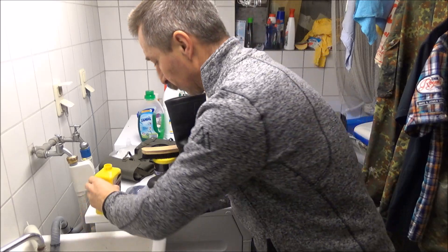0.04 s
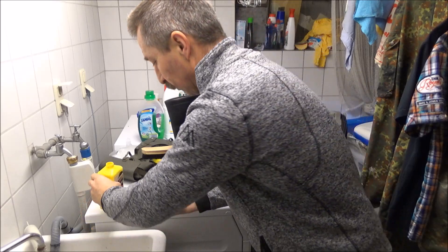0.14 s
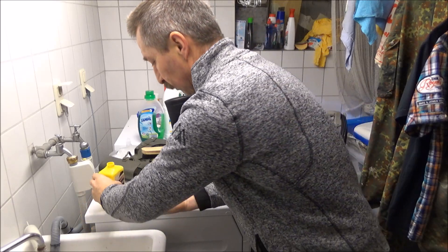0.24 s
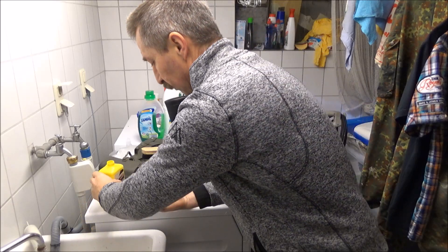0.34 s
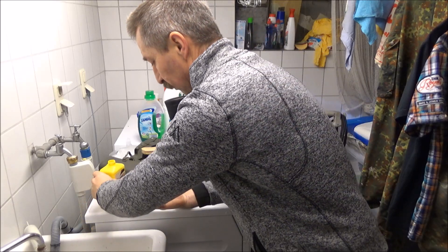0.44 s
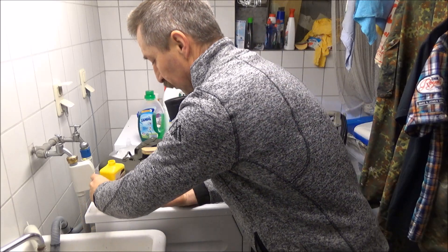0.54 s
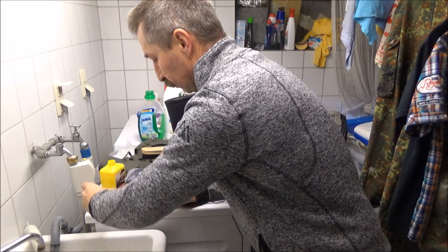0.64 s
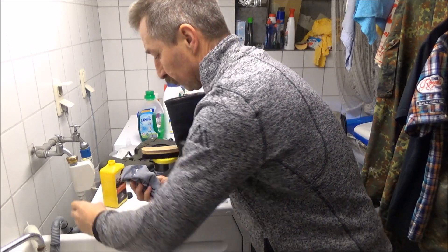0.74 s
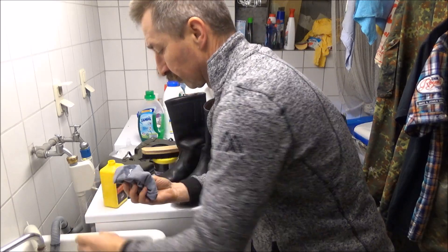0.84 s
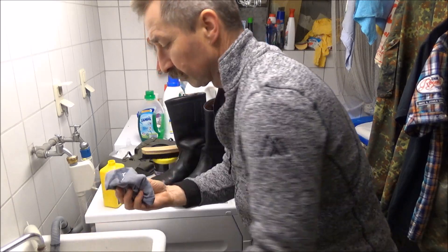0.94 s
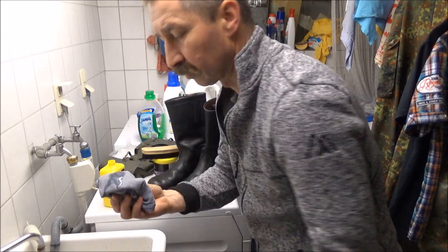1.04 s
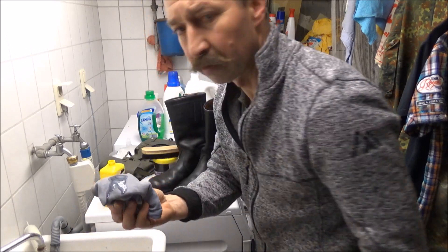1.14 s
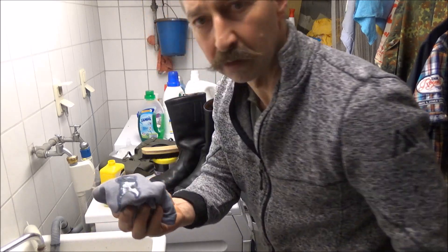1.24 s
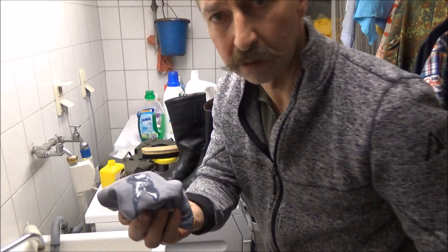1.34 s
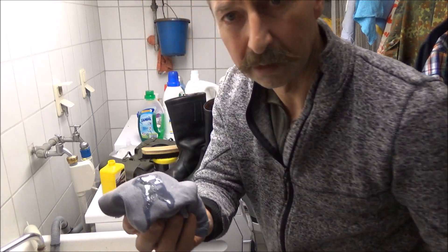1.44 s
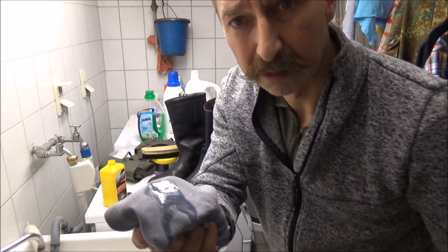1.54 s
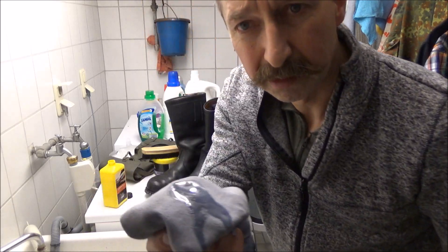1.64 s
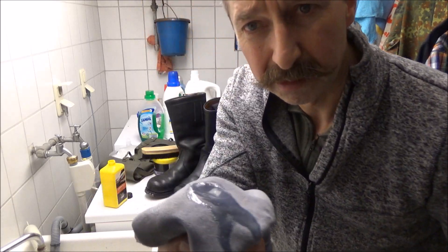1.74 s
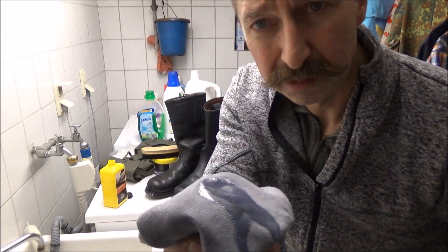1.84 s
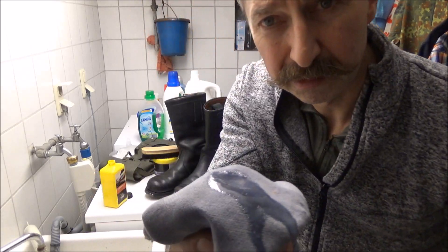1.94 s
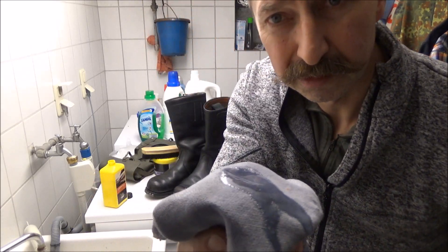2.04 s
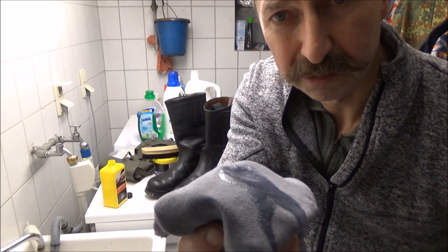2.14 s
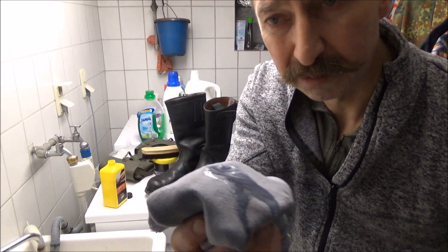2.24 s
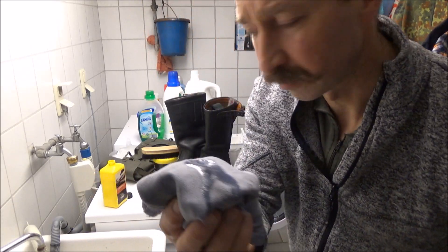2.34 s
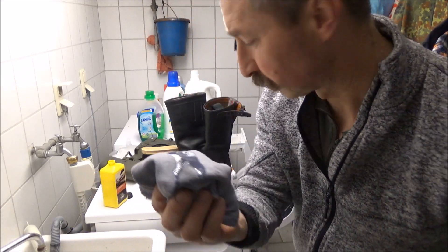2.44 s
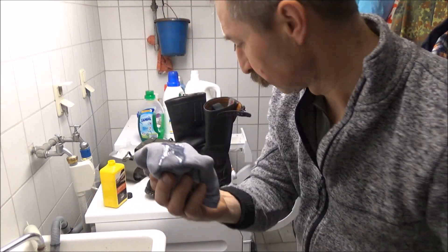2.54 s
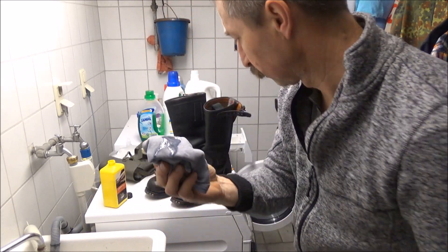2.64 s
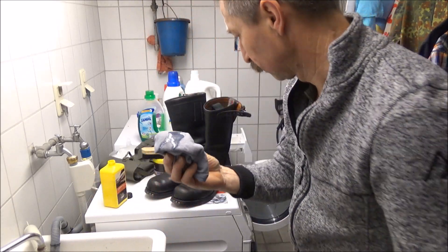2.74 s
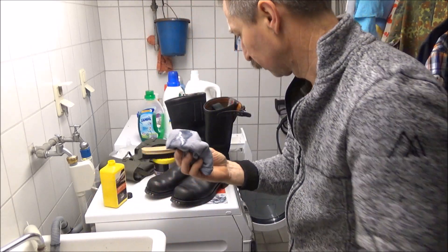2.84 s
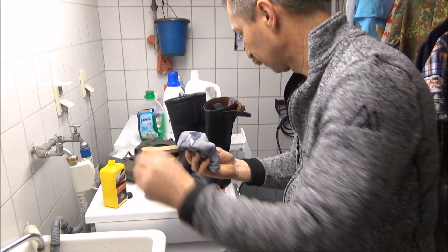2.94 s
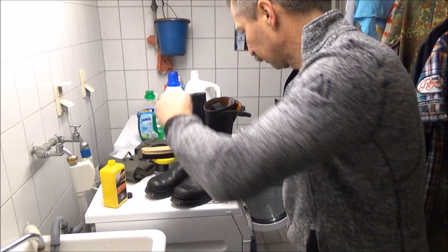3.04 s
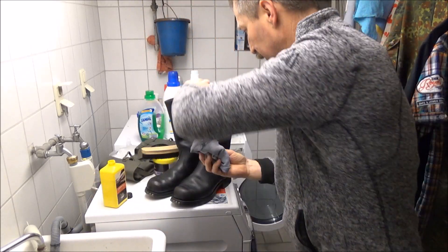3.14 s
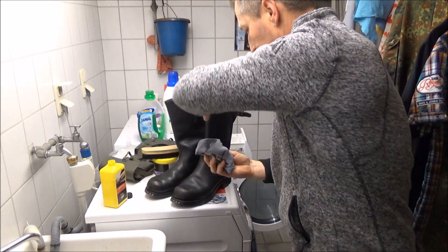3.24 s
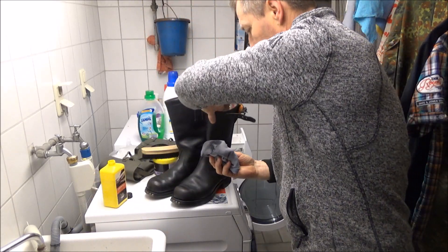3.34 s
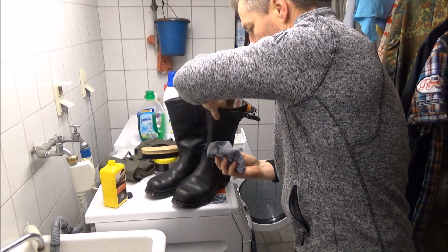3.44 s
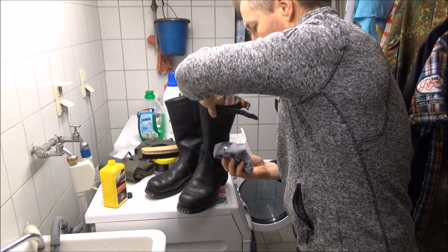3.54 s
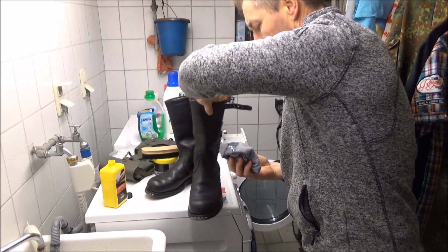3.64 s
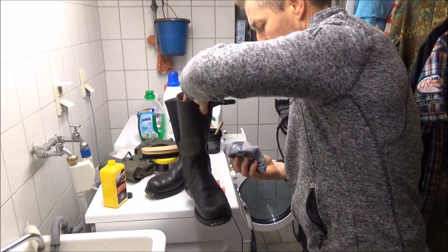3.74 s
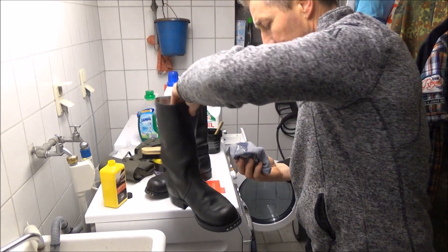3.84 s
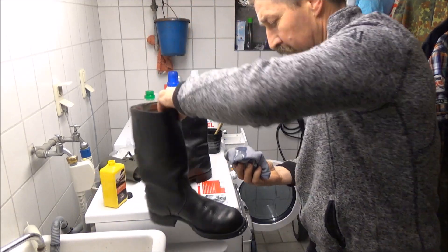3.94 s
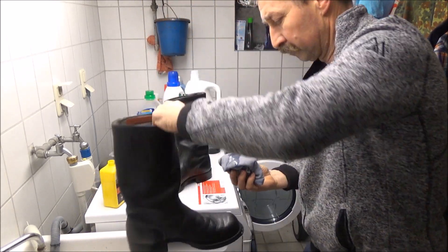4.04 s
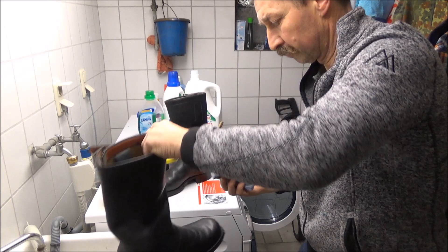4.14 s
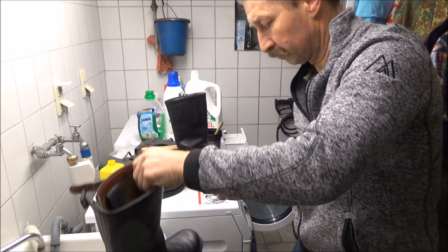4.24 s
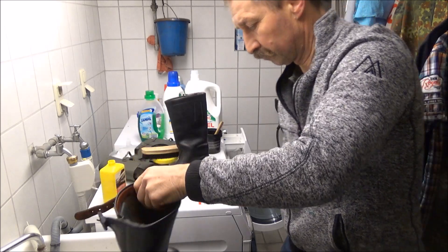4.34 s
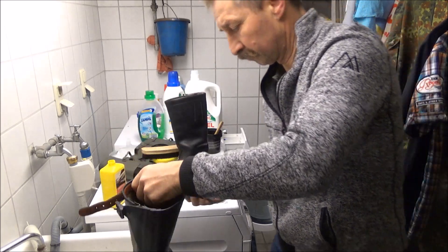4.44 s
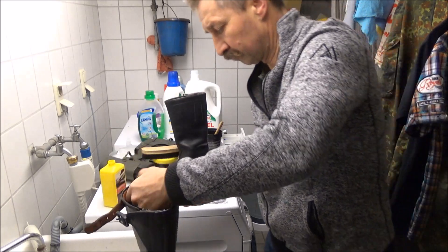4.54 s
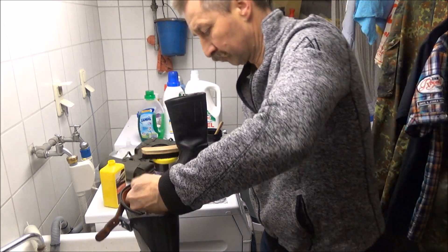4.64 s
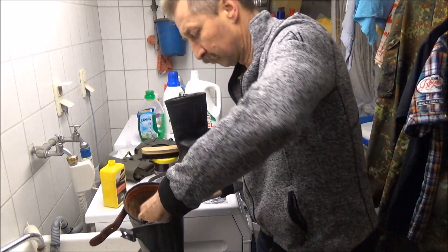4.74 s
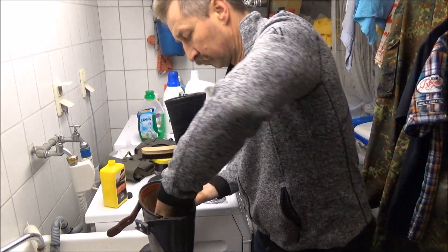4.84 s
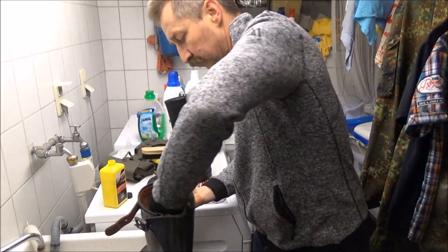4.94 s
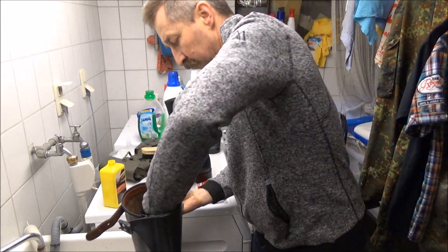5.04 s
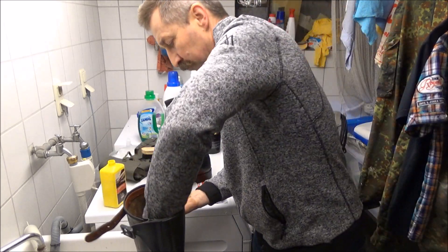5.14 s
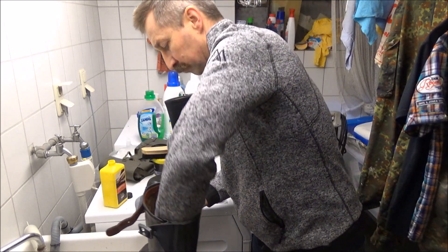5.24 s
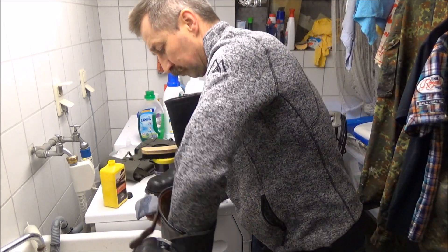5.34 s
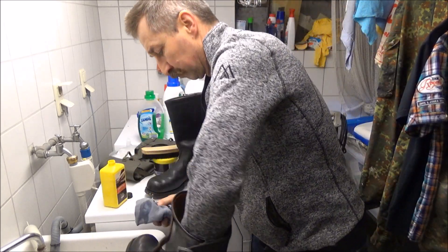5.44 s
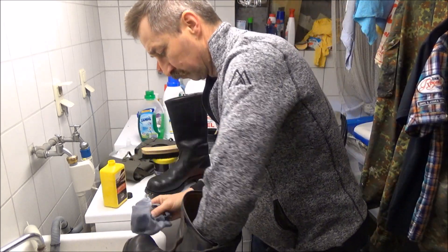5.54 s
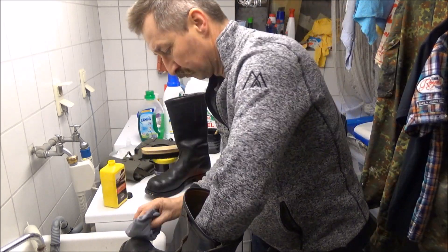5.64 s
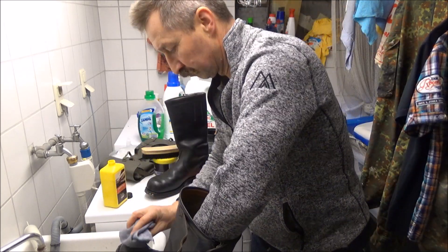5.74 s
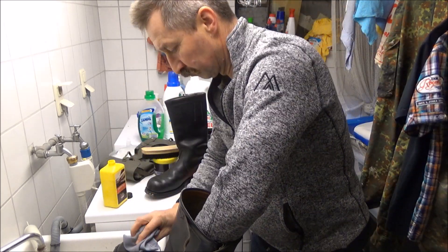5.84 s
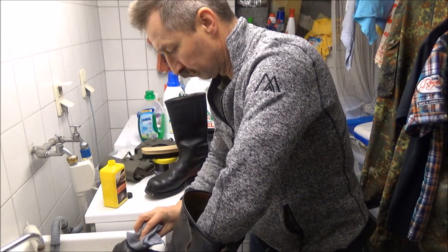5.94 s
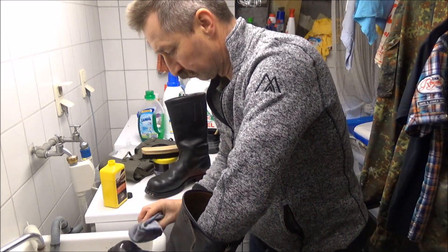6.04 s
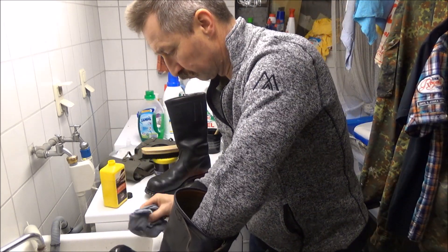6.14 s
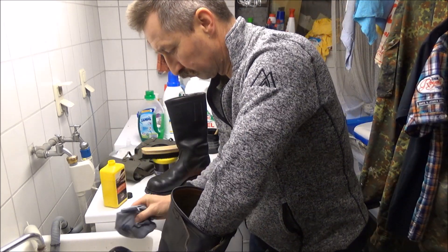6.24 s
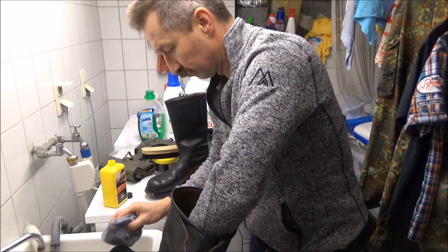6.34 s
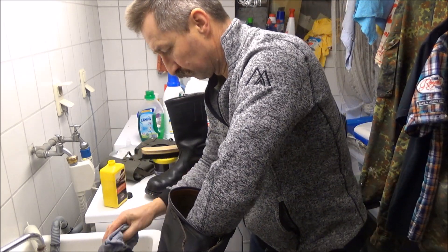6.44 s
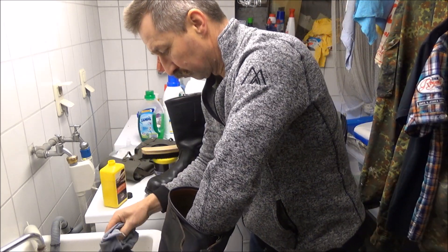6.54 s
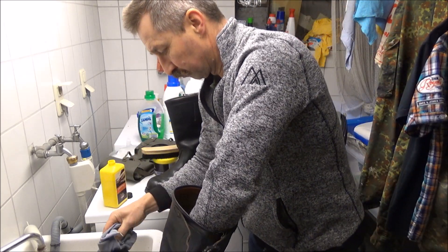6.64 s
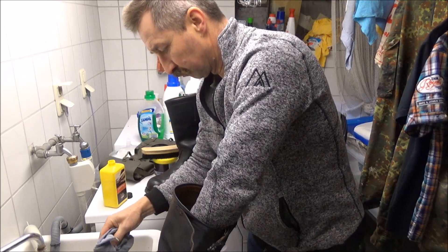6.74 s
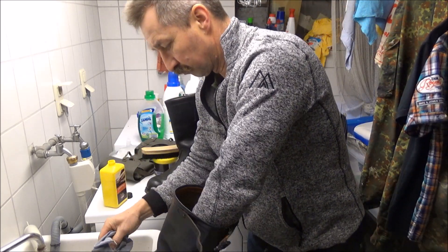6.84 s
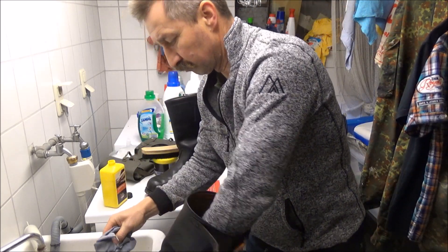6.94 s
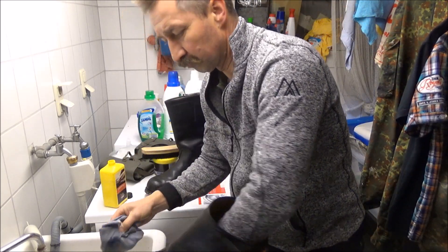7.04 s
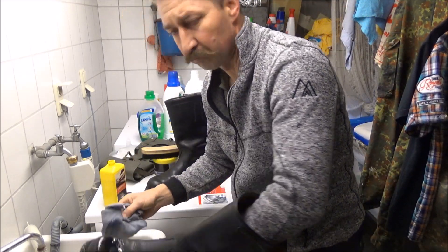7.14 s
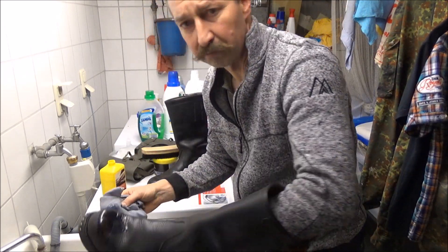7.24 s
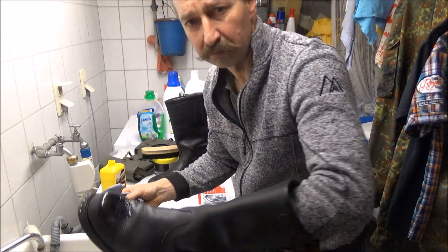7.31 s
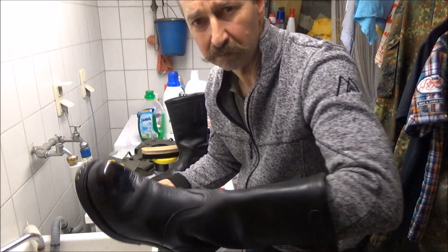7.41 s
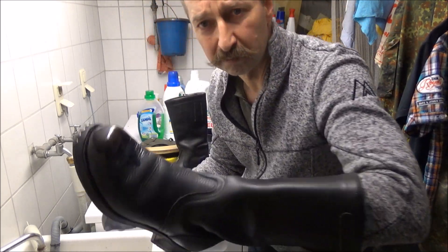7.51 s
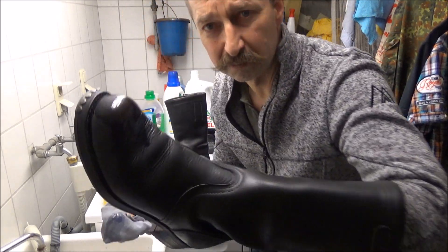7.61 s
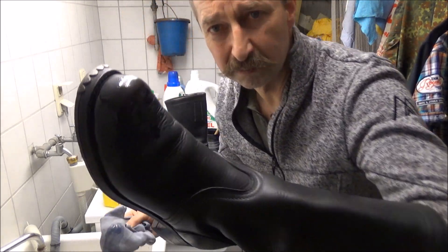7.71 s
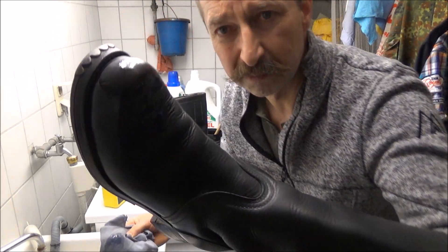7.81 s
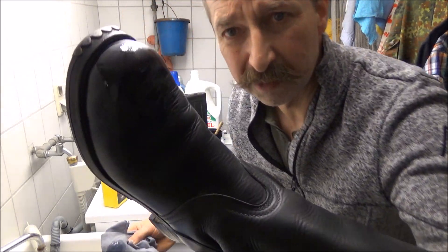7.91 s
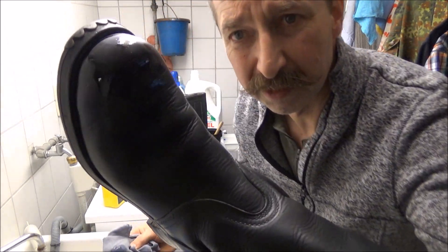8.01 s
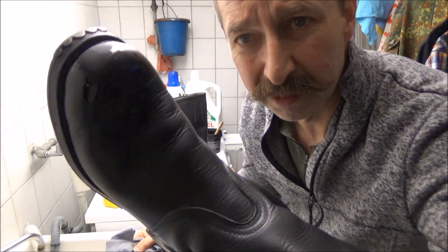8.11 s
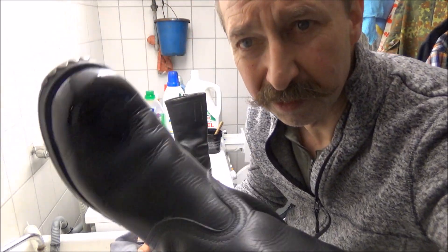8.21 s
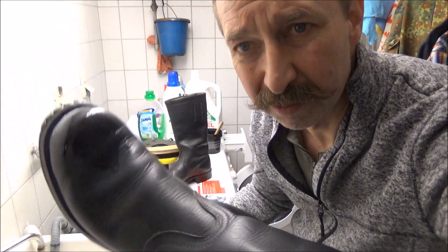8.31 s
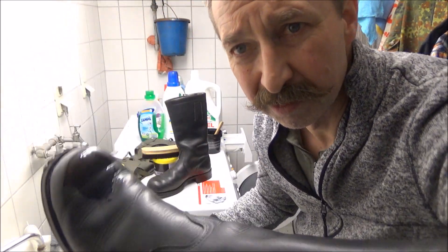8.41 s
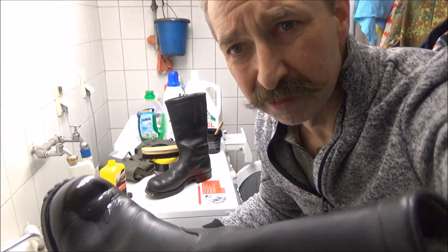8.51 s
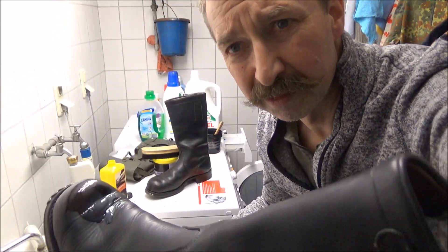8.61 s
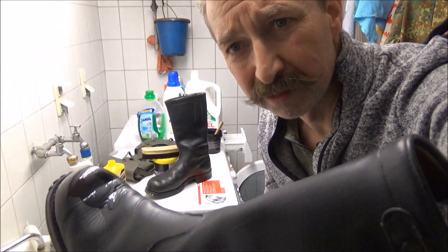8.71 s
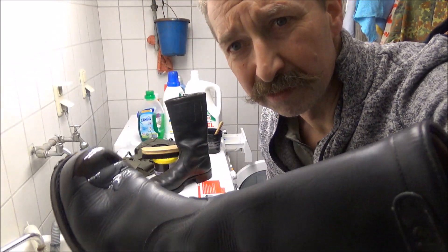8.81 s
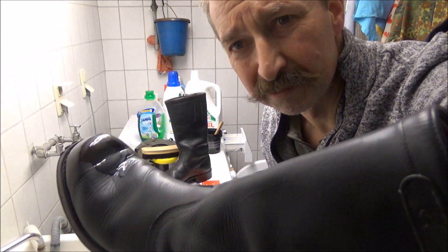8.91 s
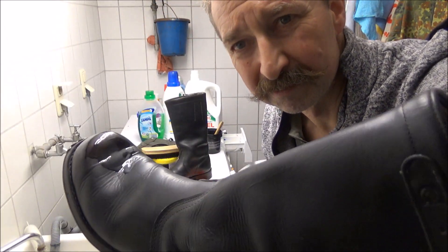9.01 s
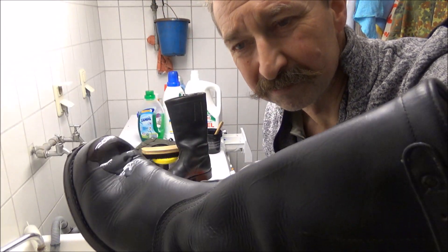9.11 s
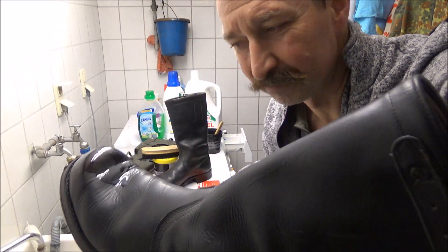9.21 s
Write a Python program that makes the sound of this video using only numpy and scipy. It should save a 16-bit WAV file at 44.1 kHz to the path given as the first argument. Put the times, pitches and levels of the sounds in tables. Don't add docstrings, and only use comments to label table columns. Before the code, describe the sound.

A small tiled laundry room, heard close on a camera microphone: soft air hiss, a low steady hum around 50 Hz, a thin high whine and very faint regular ticking throughout. At 0.25 s a plastic bottle lands on a machine lid with a short boomy knock, rocks and settles by 0.4. Quiet until 2.4, then small clicks at 2.7 as boots are handled; leather scrapes, flexes and squeaks in uneven drags from 2.7 to 4.3, with soft bumps near 3.4. At 4.35 a heel strikes the tub, by far the loudest sound, hollow and ringing, with tiny bounces. A sleeve rustles in the hollow shaft, with a dull low thud at 5.28. Faint rubbing follows, a sharp dry click at 6.87, soft brushing around 7, light taps from 7.5 to 8.1 and a high brass tinkle at 7.9, then near stillness to about 9.3.

```python
import sys
import numpy as np
from scipy import signal
from scipy.fft import rfft, irfft, next_fast_len
from scipy.io import wavfile
from scipy.ndimage import uniform_filter1d, map_coordinates

SR = 44100
rng = np.random.default_rng(int(sys.argv[2]) if len(sys.argv) > 2 else 0)


def ratio_of_db(decibels):
    return 10 ** (np.asarray(decibels, float) / 20)


def transcribe(u):
    v = np.clip(np.atleast_2d(u).T, -1, 1)
    q = np.round(v * 32767).astype(np.int16)
    wavfile.write(sys.argv[1], SR, q)


N = 408807


def unit(x):
    return x / np.sqrt(np.mean(x ** 2) + 1e-20)


def along(points, hz):
    f, v = np.transpose(points)
    return np.interp(np.log(hz + 1), np.log(f + 1), v)


def wobble(rate_hz):
    knots = rng.standard_normal(int(N * rate_hz / SR) + 4)
    return map_coordinates(knots, [np.arange(N) * rate_hz / SR])


def filtered(x, response):
    m = next_fast_len(N + SR // 2)
    return irfft(rfft(x, m) * response(np.fft.rfftfreq(m, 1 / SR)), m)[..., :N]


def resonant(x, peaks):
    def response(f):
        total = 0
        for k, (c, w, db) in enumerate(peaks):
            total = total + (-1) ** k * ratio_of_db(db) * 1j * f * w / (c * c - f * f + 1j * f * w)
        return total
    return filtered(x, response)


def panned(x, pan_db):
    return np.array([x * ratio_of_db(pan_db / 2), x * ratio_of_db(-pan_db / 2)])


def dying(points, channels):
    length = SR * 3 // 4
    hz, t, z = signal.stft(rng.standard_normal((channels, length)), SR, nperseg=256)
    level_db = along([(p[0], p[1]) for p in points], hz)[:, None]
    t60 = along([(p[0], p[2]) for p in points], hz)[:, None]
    return signal.istft(z * ratio_of_db(level_db - 60 * t / t60), SR, nperseg=256)[1][:, :length]


# [f/Hz, level/dB per Hz]
AIR = [(44, -14), (75, -3.5), (154, -10.5), (240, -6.5), (700, -10.5), (2430, -13.5), (9990, -21.5),
       (16000, -26.5)]
# [f/Hz, width/Hz, level/dB]
AIR_HUMPS = [(474, 70, 2.5), (990, 190, 4)]
# [f/Hz, correlation]
AIR_ALIKE = [(60, 1.0), (180, 0.32), (550, 0.066), (1650, 0.13), (4970, 0.27), (15000, 0.61)]


def room_air():
    def response(hz):
        humps_db = sum(db * np.exp(-((hz - c) / w) ** 2) for c, w, db in AIR_HUMPS)
        turn = np.arccos(np.clip(along(AIR_ALIKE, hz), -1, 1)) / 2
        return ratio_of_db(along(AIR, hz) + humps_db) * [np.cos(turn), np.sin(turn)]
    mid, side = filtered(rng.standard_normal((2, N)), response)
    return ratio_of_db(-57.5 + 0.027 * wobble(1.0)) * unit(np.array([mid + side, mid - side]))


# [t/s, level/dB]
HUM_SWELL = [(0.0, -46.5), (0.49, -46.5), (3.54, -46.5), (3.77, -45.5), (5.65, -46), (5.96, -46.5),
             (9.27, -46.5)]
# [multiple, level/dB rms]
HUM = [(2, -71.5), (3, -72.5), (7, -77.5), (8, -79.5), (10, -74.5), (40, -80)]


def freezer_hum():
    hum_hz, lag_rad = 49.495, 0.1
    t = np.arange(N) / SR
    phase = 2 * np.pi * hum_hz * t
    swell = ratio_of_db(np.interp(t, *np.transpose(HUM_SWELL)))
    hum = swell * np.sqrt(2) * np.sin(phase + np.array([[lag_rad], [-lag_rad]]))
    for k, db in HUM:
        hum = hum + ratio_of_db(db + 2.8 * wobble(12.0)) * np.sqrt(2) * np.sin(k * phase)
    return hum


# [t/s, level/dB]
WHINE_SWELL = [(0.0, -75), (.33, -69), (1.4, -71), (2.15, -78.5), (2.26, -65), (2.6, -73), (3.33, -72),
               (3.6, -69), (5.52, -70), (6.4, -68), (6.53, -67), (6.7, -74), (9.27, -73)]
# [f/Hz, width/Hz, level/dB re whine]
WHINE = [(5064, 3.5, -0.5), (7640, 7.1, -13)]


def camera_whine():
    swell_db = np.interp(np.arange(N) / SR, *np.transpose(WHINE_SWELL))
    whine = np.zeros(N)
    for hz, width_hz, db in WHINE:
        line = unit(resonant(rng.standard_normal(N), [(hz, width_hz, 0)]))
        whine += ratio_of_db(db + swell_db) * line
    return whine


# [f/Hz, width/Hz, level/dB]
TICK = [(3040, 120, 4), (3680, 95, 7.5), (2000, 370, -23)]


def camera_tick():
    frame_hz, start_s = 25, .0162
    frames = np.arange(start_s, N / SR, 1 / frame_hz)
    kicks = np.zeros(N)
    kicks[(frames * SR).astype(int)] = ratio_of_db(1.9 * rng.standard_normal(len(frames)))
    return ratio_of_db(-71) * unit(resonant(kicks, TICK))


# [f/Hz, t60/s]
TILES = [(150, 0.11), (1000, 0.13), (4000, 0.17), (12000, 0.21)]


def room(x):
    tail = dying([(hz, 0, t60) for hz, t60 in TILES], channels=2)
    late = np.pad(x, ((0, 0), (130, 0)))
    return signal.fftconvolve(late, tail / np.linalg.norm(tail[0]), axes=1)[:, :N]


def struck(events, modes, clatter, contact_s, pan_db):
    out, t = np.zeros((2, N + SR)), np.arange(SR * 3 // 4) / SR
    hz, level_db, t60 = np.transpose(modes)[:, :, None]
    chance = rng.standard_normal((len(events), len(modes), 1))
    for (s, db, clatter_db), scatter in zip(events, chance):
        decay = ratio_of_db(level_db + 1.2 * scatter - 60 * t / t60)
        ring = (decay * np.sin(2 * np.pi * hz * t)).sum(0)
        same, left, right = dying(clatter, channels=3)
        dense = same + 0.45 * np.array([left, right])
        blow = ring / np.abs(ring).max() + ratio_of_db(clatter_db) * dense / np.abs(same).max()
        out[:, round(s * SR):][:, :len(t)] += ratio_of_db(db) * (1 - np.exp(-t / contact_s)) * blow
    return out[:, :N] * panned(1.0, pan_db)[:, None]


# [t/s, peak level/dB, clatter/dB re peak]
BOTTLE = [
    (0.2545, -29.5, -3),
    (0.279, -38, -6),
    (0.305, -32.5, -9),
    (0.386, -47, 2),
]
# [f/Hz, level/dB, t60/s]
LID = [(133, 4.5, 0.21), (204, 7, 0.15), (331, 1, 0.18), (621, 7, 0.066), (1160, -1.5, .06)]
# [f/Hz, level/dB, t60/s]
LID_CLATTER = [(80, -13, .25), (200, -2, 0.3), (600, 10, 0.09), (1200, -10, 0.068), (3000, -16, 0.056),
               (8000, -45, .06), (16000, -60, .04)]


def bottle():
    return struck(BOTTLE, LID, LID_CLATTER, 0.00075, .6)


# [t/s, peak level/dB, clatter/dB re peak]
BUCKLE = [
    (7.9094, -36, -8),
    (7.924, -38, 1),
]
# [f/Hz, level/dB, t60/s]
BRASS = [(7160, -6, .03), (7850, -6, 0.03), (8750, 4, 0.025)]
# [f/Hz, level/dB, t60/s]
BRASS_CLATTER = [(1000, -20, 0.027), (5000, 0, 0.027), (10000, 1, .03), (16000, -30, .02)]


def buckle():
    return struck(BUCKLE, BRASS, BRASS_CLATTER, .002, 0.092)


# [t/s, peak level/dB, f/Hz, t60/s]
BUMPS = [(2.79, -43, 670, 0.06), (3.328, -51, 396, 0.066), (3.356, -38.5, 583, 0.058),
         (3.33, -45, 169, 0.063), (3.407, -38, 97, 0.056), (4.533, -33, 635, 0.095),
         (4.529, -32, 269, 0.075), (4.986, -41, 560, 0.074), (5.195, -41, 596, .1),
         (5.182, -42, 610, 0.055), (4.592, -37.5, 580, 0.078), (4.852, -39, 238, 0.13),
         (5.075, -39, 217, 0.12), (5.281, -21, 114, 0.033), (5.308, -35.5, 226, 0.12),
         (5.498, -51, 167, 0.079), (6.13, -56, 91.5, 0.1), (6.5, -58, 91.5, 0.086),
         (6.715, -46, 135, 0.087), (6.87, -47, 134, 0.073), (7.514, -40, 354, 0.021),
         (7.657, -42, 506, 0.023)]


def bumps():
    out, t = np.zeros(N + SR), np.arange(SR // 3) / SR
    for s, db, hz, t60 in BUMPS:
        puff = unit(uniform_filter1d(rng.standard_normal(len(t)), size=int(SR / hz / 3) + 1))
        push = np.sin(2 * np.pi * hz * t) + 0.2 * puff
        out[round(s * SR):][:len(t)] += ratio_of_db(db + 2.5 - 60 * t / t60) * (1 - np.exp(-t / 0.0017)) * push
    return out[:N]


# [t/s, peak level/dB, f/Hz, ring t60/s, rattle/dB re peak]
CLICKS = [(0.256, -38, 1470, .006, -7), (0.297, -41.5, 3300, .006, 0), (0.388, -42, 1290, .008, 0),
          (3.3268, -42.5, 1800, 0.0045, -4), (7.539, -51, 2200, .006, 2), (2.4313, -39, 8750, 0.0033, 2),
          (2.7073, -33, 1770, .016, 0), (2.718, -37.5, 3390, 0.062, -12), (2.748, -37.5, 2270, 0.062, -6),
          (3.4029, -29.5, 2720, 0.0071, -4), (4.134, -36, 2250, 0.012, 3), (4.18, -32, 2200, 0.017, -3),
          (4.183, -33, 3330, 0.032, -8), (4.28, -38, 2300, .01, 1), (4.285, -35, 2600, 0.022, -4),
          (4.402, -29.5, 2500, 0.0033, 2.5), (4.446, -38.5, 2420, 0.01, -7),
          (4.585, -44.5, 1400, 0.049, -13), (5.417, -38, 10000, .003, -8), (5.724, -46, 2440, .004, 0),
          (6.8675, -19, 2680, 0.00032, -7.5), (6.869, -37, 2130, .012, -13),
          (7.657, -37.5, 1470, 0.0026, -6), (7.704, -33, 6000, 0.0008, -14),
          (7.745, -40.5, 4000, 0.0018, -4), (7.774, -33, 6500, 0.00073, -10.5),
          (7.849, -34.5, 3000, 0.0012, -8), (7.868, -49, 2900, .015, -8), (7.928, -50, 3340, 0.12, -12),
          (7.94, -50, 3340, .14, -18), (8.14, -44, 1270, 0.012, -17), (7.998, -40.5, 5000, .007, -8)]
# [t/s, left-right level/dB]
BOOT_SIDE = [(2.7, 3.5), (4.1, 2), (6.87, 3), (7.6, -1.1)]


def clicks():
    out, t = np.zeros((2, N + SR)), np.arange(SR // 5) / SR
    for s, db, hz, t60, rattle_db in CLICKS:
        ring = ratio_of_db(-60 * t / t60) * np.cos(2 * np.pi * hz * t)
        band = signal.butter(1, [hz * .5, min(hz * 2.36, SR / 2.2)], "band", fs=SR)
        noise = unit(signal.lfilter(*band, rng.standard_normal(len(t))))
        rattle = ratio_of_db(rattle_db - 8 - 60 * t / 0.059) * noise
        pan_db = np.interp(s, *np.transpose(BOOT_SIDE))
        out[:, round(s * SR):][:, :len(t)] += panned(-ratio_of_db(db) * (ring + rattle), pan_db)
    return out[:, :N]


# [t/s, peak level/dB, clatter/dB re peak]
HEEL = [
    (4.354, -2, -10),
    (4.401, -22.5, 5.5),
    (4.444, -26.5, 0),
    (4.527, -30.5, -11),
    (4.836, -34, -1.5),
]
# [f/Hz, level/dB, t60/s]
TUB = [(122, -12, 0.18), (172, -3, 0.13), (197, -0.5, 0.17), (222.7, -0.5, 0.28), (276.6, -9.5, 0.25),
       (330, -15, 0.23), (395, -9, 0.18), (577, -11, 0.18), (609, -0.5, 0.34), (666, 0.5, 0.28),
       (832, -6.5, 0.2), (948, -22, 0.13), (1014, -10, 0.091), (1150, -13, 0.11)]
# [f/Hz, level/dB, t60/s]
TUB_CLATTER = [(80, -11, 0.51), (250, -6.5, 0.33), (700, -0.5, 0.17), (1400, -10, 0.16), (2500, -25, 0.23),
               (5000, -21.5, 0.13), (10000, -41, 0.11), (16000, -55, .05)]
# [f/Hz, phase/rad]
TUB_LAG = [(60, 0.75), (260, 1), (1030, 0.75), (3270, 0)]


def heel():
    blows = struck(HEEL, TUB, TUB_CLATTER, 0.0026, 1.7)
    return filtered(blows, lambda hz: np.exp(np.outer([-.5j, .5j], along(TUB_LAG, hz))))


def slips(spread_db, clump_db, clump_hz):
    spread = spread_db * np.minimum(rng.exponential(size=N), 5)
    return ratio_of_db(spread + clump_db * wobble(clump_hz)) * rng.standard_normal(N)


def patchy(x, depth_db, bump_db=lambda hz, t: 0, size=256):
    hz, t, z = signal.stft(x, SR, nperseg=size)
    field = uniform_filter1d(rng.standard_normal(z.shape), size=4, axis=0)
    field = uniform_filter1d(field, size=3072 // size, axis=1)
    gain = ratio_of_db(depth_db * unit(field) + bump_db(hz[:, None], t))
    return unit(signal.istft(z * gain, SR, nperseg=size)[1][:N])


def strokes(rows):
    end_drop_db, curve = 21.5, 1.63
    top_s, db, swell_s, fade_s = np.transpose(rows)[:4, :, None]
    off = np.arange(0, N / SR + .002, .001) - top_s
    reach = np.abs(off / np.where(off < 0, swell_s, fade_s))
    return ratio_of_db(db - end_drop_db * reach ** curve) ** 2 + 1e-12


def read(per_ms, t):
    return np.interp(t * 1000, np.arange(len(per_ms)), per_ms)


def level(power):
    return read(np.sqrt(power.sum(0)), np.arange(N) / SR)


# [t/s, level/dB, swell/s, fade/s]
SHOVES = [(0.265, -36, .01, 0.18), (2.83, -56, 0.055, 0.074), (3.36, -46, 0.036, 0.1),
          (3.49, -52, 0.12, 0.066), (3.878, -58.5, 0.11, 0.17), (4.318, -53, 0.029, .06),
          (4.56, -52, 0.12, 0.11), (4.878, -59, 0.25, 0.18), (5.07, -49, .15, 0.1),
          (5.29, -36.5, 0.035, 0.12), (5.522, -54.5, 0.28, 0.17), (6.132, -63.5, 0.25, 0.22),
          (6.514, -58, 0.18, 0.11), (6.7, -57, .04, 0.34), (6.87, -58, 0.26, 0.26),
          (7.676, -62, 0.15, 0.13), (8.0, -66, .2, 0.16)]


def rumble():
    low = resonant(slips(0.52, 6.5, 25), [(124, 160, 0)])
    return level(strokes(SHOVES)) * unit(resonant(low, [(138, 130, 0)]))


# [from t/s, to t/s]
IN_TUB = (4.56, 5.36)


def wall_contact():
    on_s, off_s = IN_TUB
    return np.interp(np.arange(N) / SR, [on_s - .05, on_s, off_s, off_s + 0.048], [0, 1, 1, 0])


# [t/s, level/dB, swell/s, fade/s, f/Hz]
FLEXES = [(0.265, -45, 0.009, 0.22, 379), (0.39, -49, 0.069, 0.13, 650), (2.711, -45.5, .01, 0.13, 1270),
          (2.83, -46.5, 0.12, 0.07, 477), (3.368, -51, 0.084, 0.065, 539), (3.415, -48, 0.038, 0.11, 820),
          (3.6, -67, 0.24, 0.37, 1110), (3.814, -45.5, 0.37, 0.1, 866), (4.0, -55.5, 0.7, 0.79, 523),
          (4.222, -43, 0.11, 0.11, 1070), (4.285, -37.5, 0.015, 0.067, 940), (4.56, -50.5, 0.27, 0.22, 570),
          (4.85, -62, 0.023, 0.16, 620), (4.93, -59, 0.091, .1, 600), (4.99, -44, 0.12, 0.15, 543),
          (5.15, -47.5, .08, 0.054, 1000), (5.09, -46, 0.17, 0.081, 330), (5.205, -47, 0.17, 0.14, 620),
          (5.28, -43, 0.087, 0.11, 1200), (5.31, -45.5, .05, .1, 330), (5.5, -55, 0.45, 0.3, 465),
          (6.14, -57, 0.15, 0.2, 795), (6.55, -58.5, 0.16, .2, 700), (6.72, -56.5, 0.2, 0.21, 890),
          (6.875, -51, 0.012, 0.1, 745), (7.05, -52.5, 0.13, 0.046, 850), (7.53, -57, 0.2, 0.28, 398),
          (7.665, -49.5, 0.02, 0.18, 490), (7.93, -50.5, 0.037, 0.083, 1300), (8.03, -61, .1, 0.12, 1100),
          (8.26, -56, 0.5, 0.18, 394)]
# [f/Hz, width/Hz, level/dB]
SHAFT = [(296, 370, 0), (620, 230, 4.5), (1190, 710, 0.5)]
# [f/Hz, width/Hz, level/dB]
TUB_WALL = [(226, 38, -5.5), (593, 30, 0), (1210, 60, -8), (1850, 64, -15)]


def shaft_flexing(contact):
    flex = strokes(FLEXES)
    pitch_hz = (flex * np.transpose(FLEXES)[4][:, None]).sum(0) / flex.sum(0)

    def hollow_db(hz, t):
        return 9 * np.exp(-(np.log((hz + 1) / read(pitch_hz, t)) / 0.55) ** 2)

    shaft = patchy(resonant(slips(3.1, 2.3, 35), SHAFT), 1.7, hollow_db, size=512)
    wall = unit(resonant(slips(4.3, 1.8, 22), TUB_WALL))
    return level(flex) * (shaft + 0.69 * contact * wall)


# [t/s, scrape level/dB, swell/s,
# fade/s, fizz/dB re scrape]
DRAGS = [(0.08, -71.5, 0.33, .3, 8.5), (1.5, -70, 1, .6, 5.5), (0.31, -52.5, 0.04, 0.41, -9.5),
         (2.444, -66, 0.13, 0.15, 5), (2.715, -46.5, .012, 0.077, 1), (2.77, -37, 0.061, 0.065, -7.5),
         (3.2, -61.5, 0.46, 0.36, 2.5), (3.335, -61, .02, .03, -2), (3.5, -44.5, 0.12, 0.26, -21),
         (3.59, -43.5, 0.14, 0.14, -0.5), (3.73, -38.5, 0.12, 0.13, -5.5), (3.835, -39, 0.51, 0.092, -5),
         (4.04, -56, 0.35, .12, -1.5), (4.14, -40.5, 0.085, 0.12, -7.5), (4.185, -44, 0.051, 0.094, -13),
         (4.222, -49, .1, 0.24, 0.5), (4.299, -35.5, 0.038, 0.057, -6.5)]
SLEEVE = [(4.56, -59, 0.21, 0.23, 0), (4.72, -57, 0.28, 0.47, -14), (4.878, -52, 0.42, 0.27, -0.5),
          (4.97, -52, 0.19, 0.22, -7), (5.212, -53, 0.35, 0.44, 0), (5.333, -45.5, 0.36, 0.032, 1),
          (5.42, -53.5, 0.21, 0.11, -20), (5.75, -63, 1, 0.55, -2.5), (6.17, -65.5, 0.78, 0.18, -2.5),
          (6.55, -57.5, 0.15, 0.27, -9), (6.76, -59.5, .3, 0.65, -3), (6.89, -62, .025, .12, -19),
          (6.98, -56, 0.063, 0.12, 4.5), (7.04, -52.5, 0.13, 0.2, 2.5), (7.234, -57.5, 0.13, 0.081, -2.5),
          (7.55, -62, 0.52, 0.83, -0.5), (7.938, -56, 0.23, 0.047, -5), (8.27, -71.5, 0.22, 0.36, 7.5),
          (9.17, -62.5, 0.11, 0.37, -4)]
# [f/Hz, level/dB per Hz]
FIZZ = [(2940, -28), (4700, -6), (6020, -2.5), (7600, -2.5), (9690, 1.5), (11500, -5), (14400, -13),
        (16000, -22)]


def wool_fizz():
    fizz_db = np.transpose(DRAGS + SLEEVE)[4][:, None]
    fibres = strokes(DRAGS + SLEEVE) * ratio_of_db(fizz_db) ** 2
    noise = filtered(slips(1.8, 1.2, 45), lambda hz: ratio_of_db(along(FIZZ, hz)))
    return level(fibres) * patchy(noise, 1.6)


# [f/Hz, width/Hz, level/dB]
SCRAPE = [(1830, 870, -0.5), (2980, 1140, 3), (3970, 1520, 2.5), (5770, 2400, -3), (8000, 3400, -13)]
# [t/s, f/Hz, level/dB]
SQUEAK = [(2.78, 4520, 7), (3.46, 2900, 6), (3.56, 2920, 6), (3.7, 2370, -1.5), (3.83, 2720, 9.5),
          (4.08, 2300, -8), (4.125, 2250, 13), (4.18, 2210, 7), (4.21, 2300, 11), (4.29, 2540, 7),
          (4.88, 2950, 1), (4.97, 1800, 0), (5.25, 1850, 11), (7, 4500, 8)]


def leather_scrape():
    rub = strokes(DRAGS + SLEEVE)
    at_s, centre_hz, strength_db = np.transpose(SQUEAK)

    def squeak_db(hz, t):
        firmness = np.clip((10 * np.log10(read(rub.sum(0), t)) + 54) / 12, 0, 1)
        peak = np.exp(-((hz - np.interp(t, at_s, centre_hz)) / 220) ** 2)
        return np.interp(t, at_s, strength_db) * firmness * peak

    return level(rub) * patchy(resonant(slips(3.2, 1.3, 60), SCRAPE), 1.8, squeak_db)


def rubbing():
    contact = wall_contact()
    mix = leather_scrape() + shaft_flexing(contact) + wool_fizz() + rumble()
    return panned(ratio_of_db(-2.0) * mix, 0.39 + 1.0 * contact)


# [f/Hz, level/dB]
CAPSULE = [(40, -34), (70, -5.5), (110, 2.5), (6000, 1), (9500, -1), (12000, -11), (15000, -14)]


def capsule(x):
    return filtered(x, lambda hz: ratio_of_db(along(CAPSULE, hz)))


def scene():
    background = room_air() + freezer_hum() + camera_whine() + camera_tick()
    knocks = heel() + bottle() + bumps()
    taps = clicks() + buckle()
    rub = rubbing()
    hits = knocks + taps + ratio_of_db(-12) * room(knocks) + ratio_of_db(-2) * room(taps)
    return capsule(hits) + rub + ratio_of_db(-4.5) * room(rub) + background


# [f/Hz, level/dB]
PORTS = [(60, -24), (200, -7), (1000, -1.5), (5000, -3.5), (10000, -5.5), (13000, -21.5)]


def close_ports(dry):
    top_hz = 15740
    mid = filtered(dry.mean(0), lambda hz: hz < top_hz)
    side = filtered((dry[0] - dry[1]) / 2, lambda hz: ratio_of_db(along(PORTS, hz) + 1.5) * (hz < top_hz))
    return np.array([mid + side, mid - side])


def band_limit(x):
    return signal.sosfilt(signal.butter(12, 16410, fs=SR, output="sos"), x)


def record(dry):
    mix = close_ports(dry)
    return band_limit(mix)


dry = scene()
out = record(dry)
transcribe(out)
```